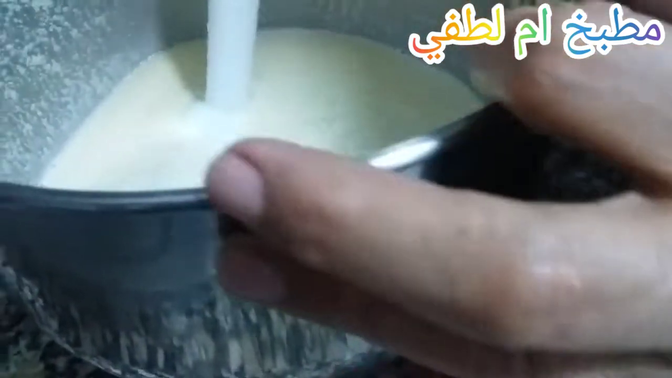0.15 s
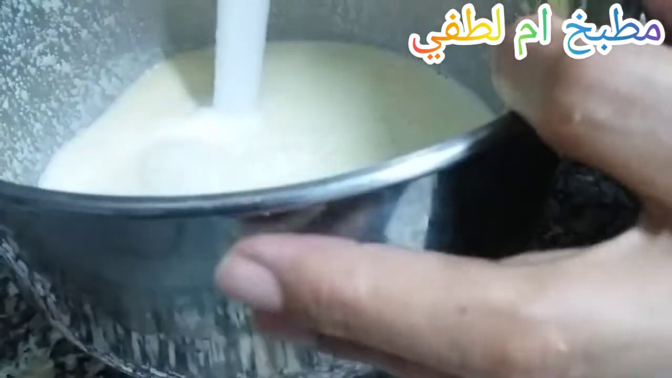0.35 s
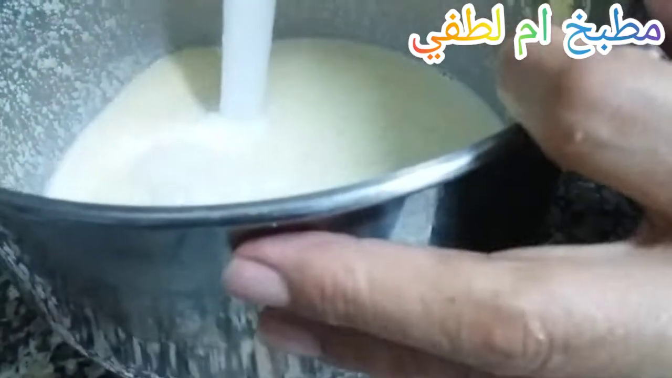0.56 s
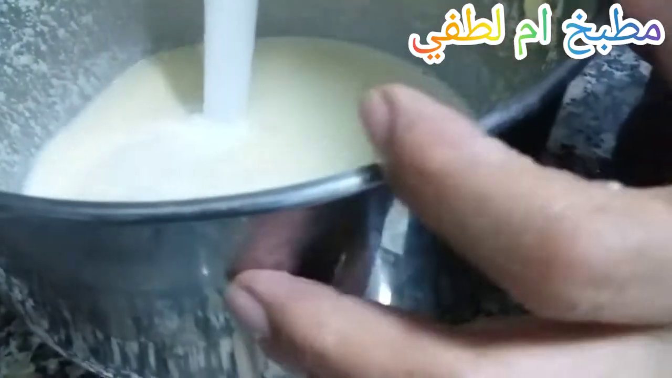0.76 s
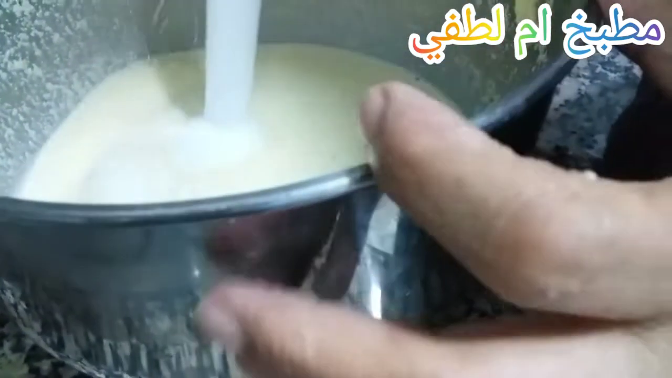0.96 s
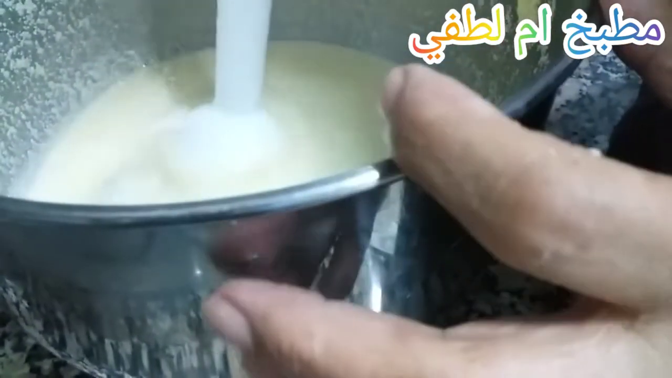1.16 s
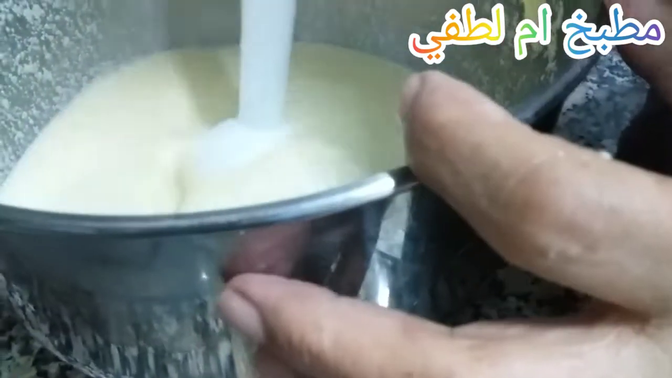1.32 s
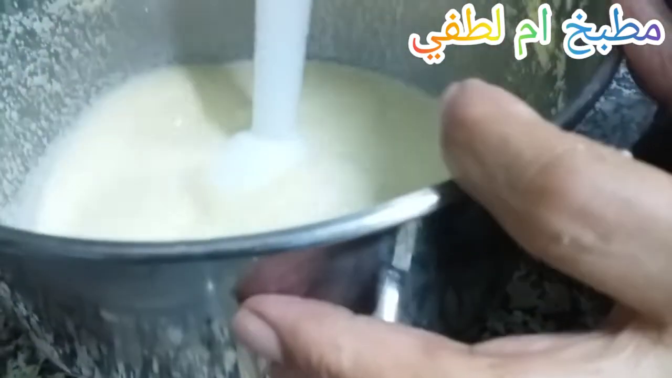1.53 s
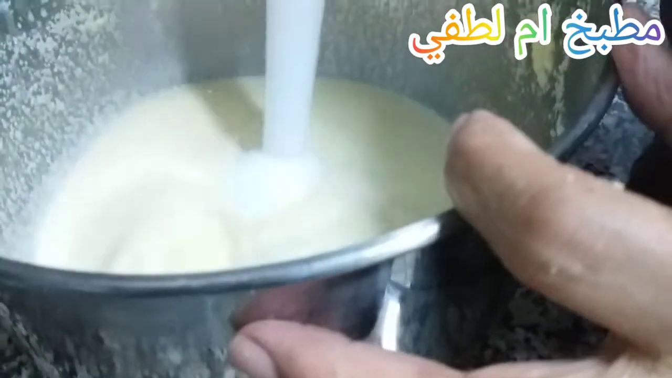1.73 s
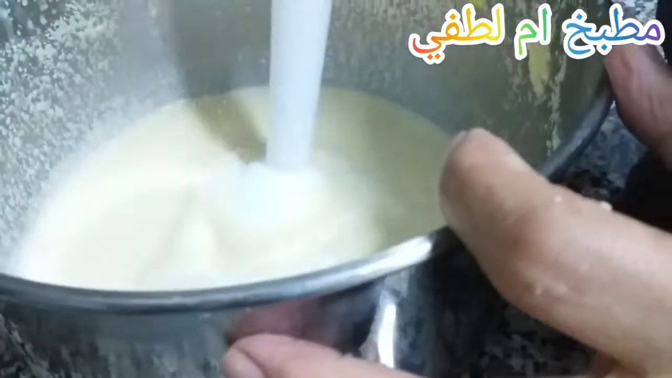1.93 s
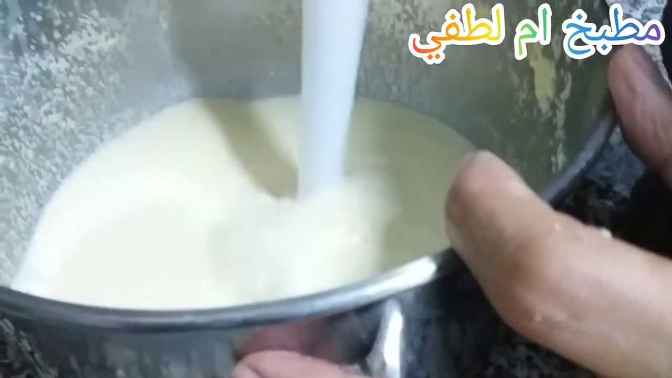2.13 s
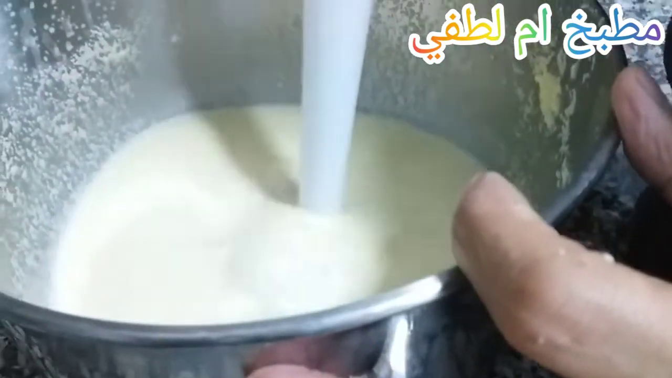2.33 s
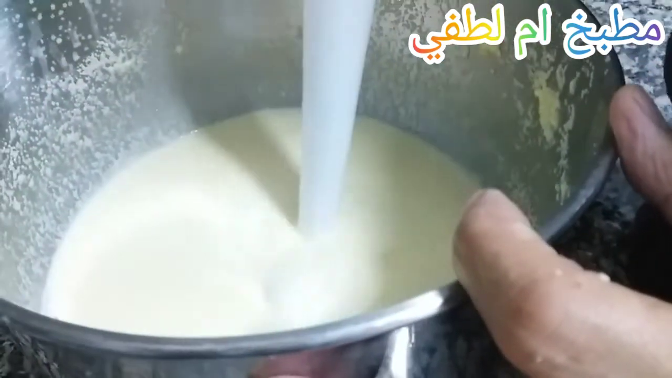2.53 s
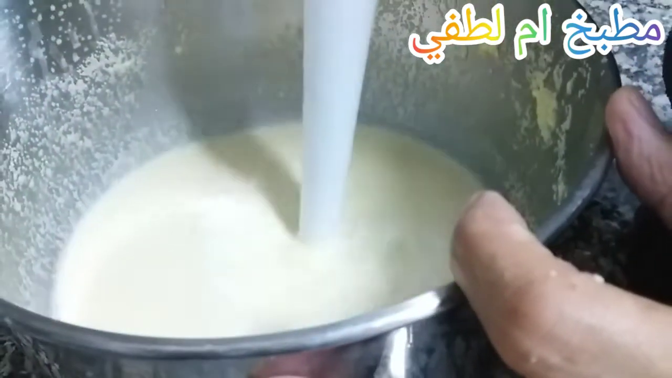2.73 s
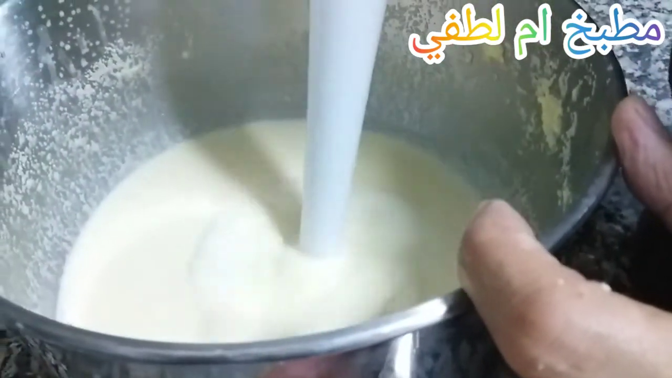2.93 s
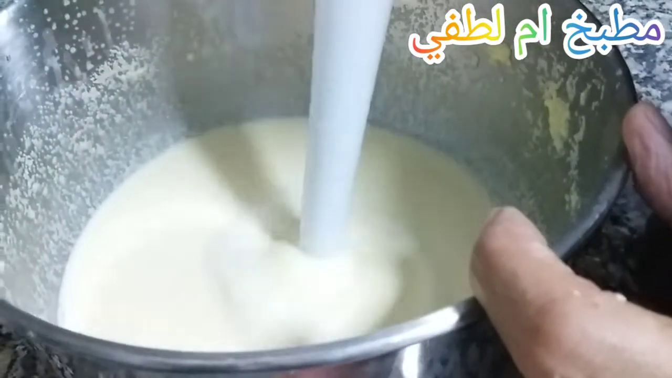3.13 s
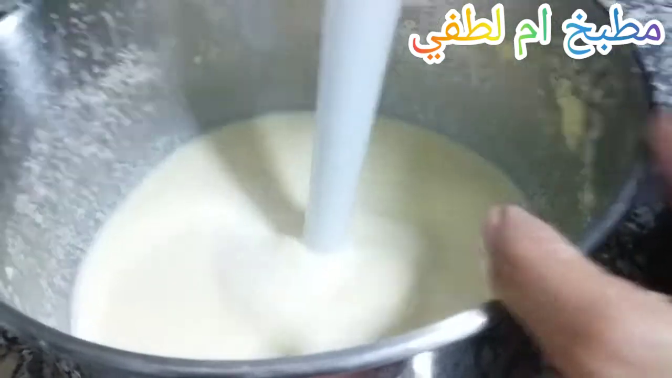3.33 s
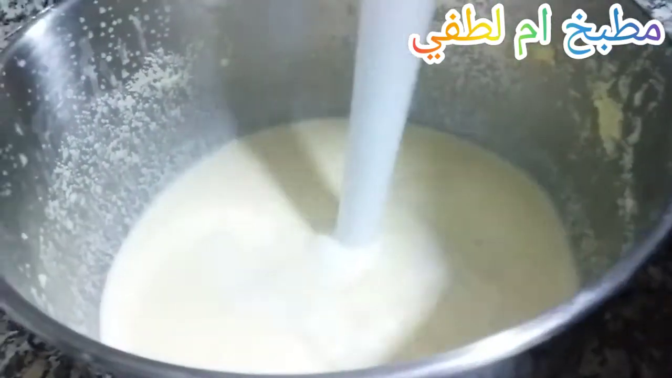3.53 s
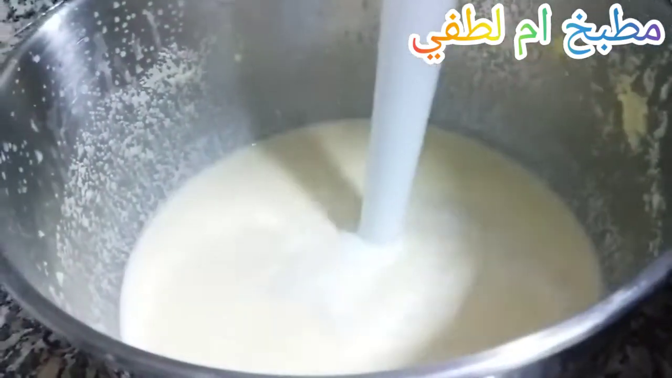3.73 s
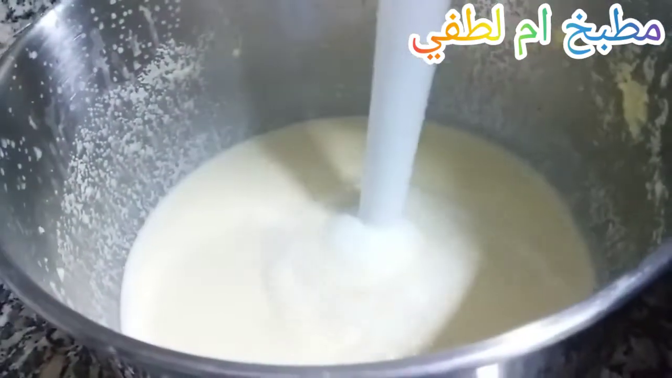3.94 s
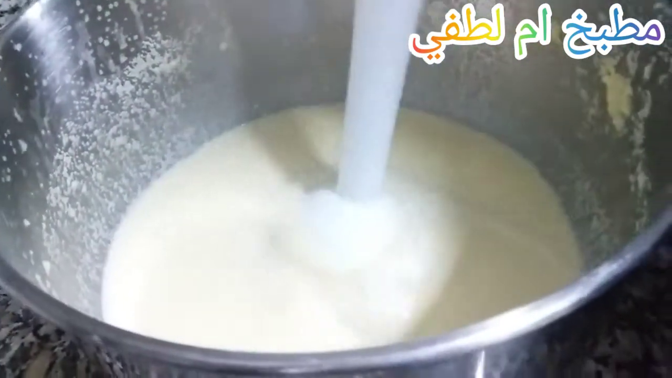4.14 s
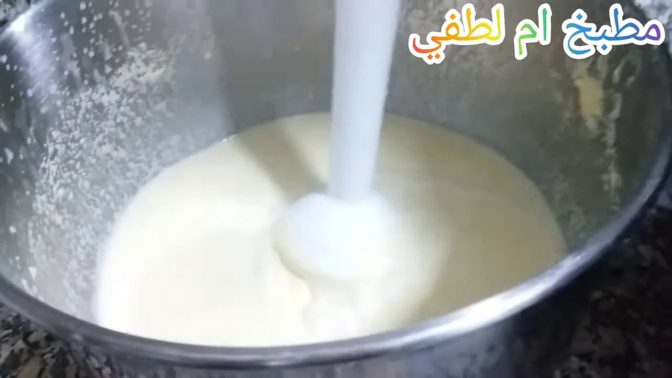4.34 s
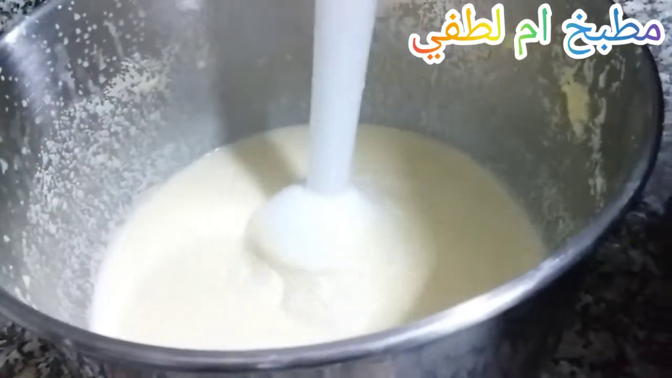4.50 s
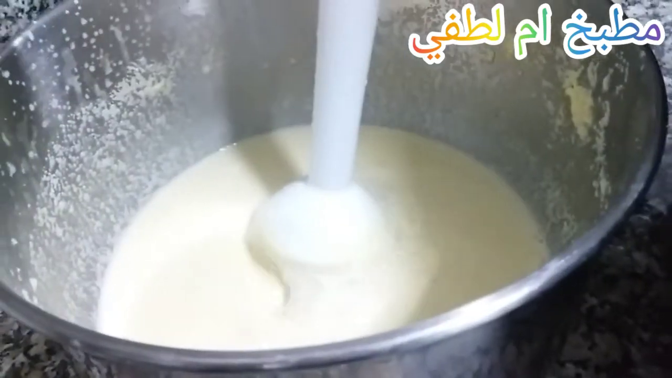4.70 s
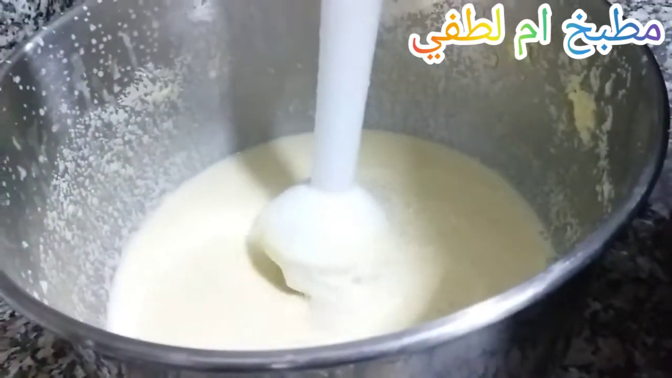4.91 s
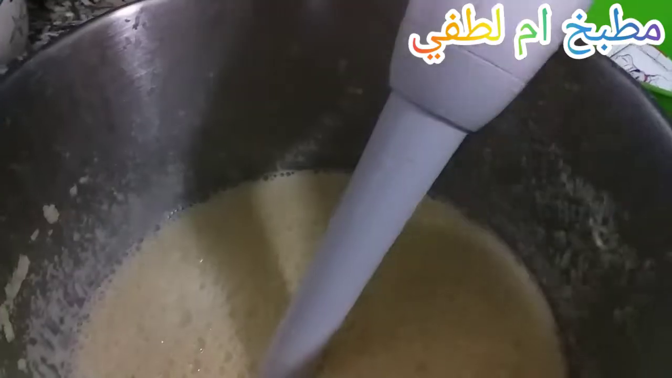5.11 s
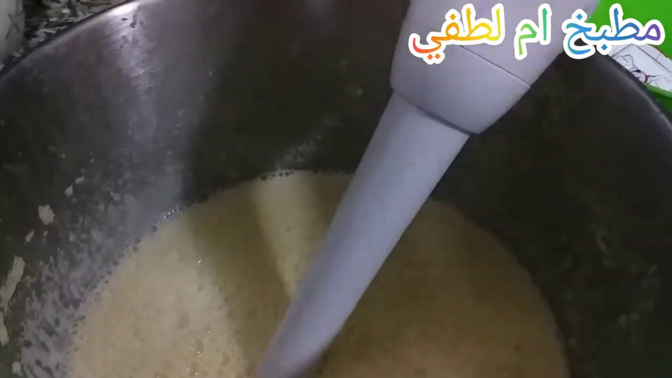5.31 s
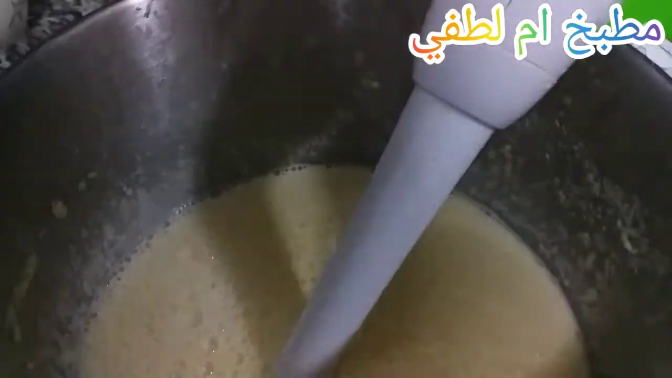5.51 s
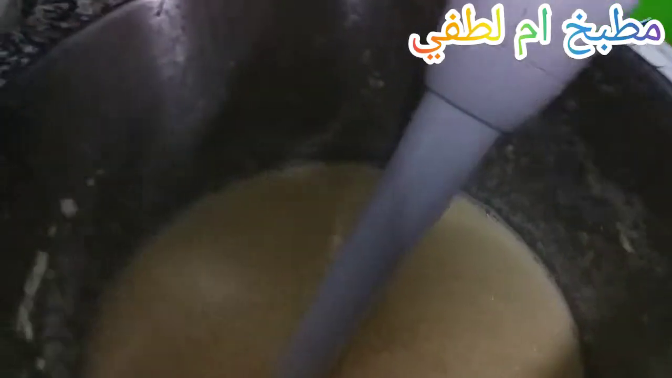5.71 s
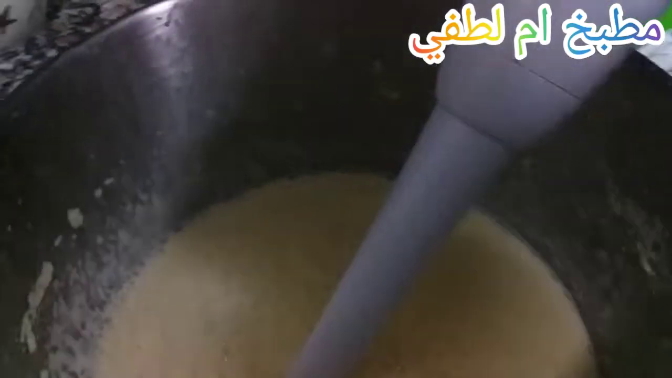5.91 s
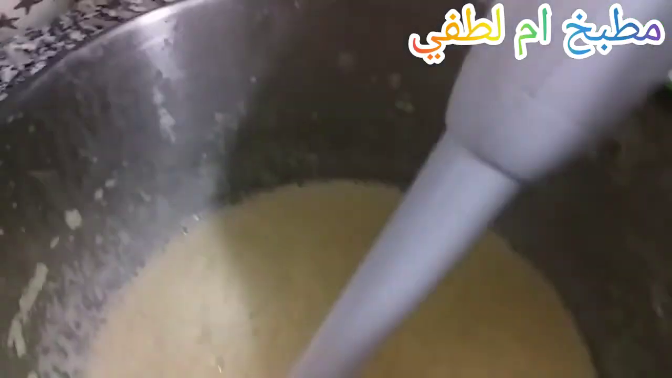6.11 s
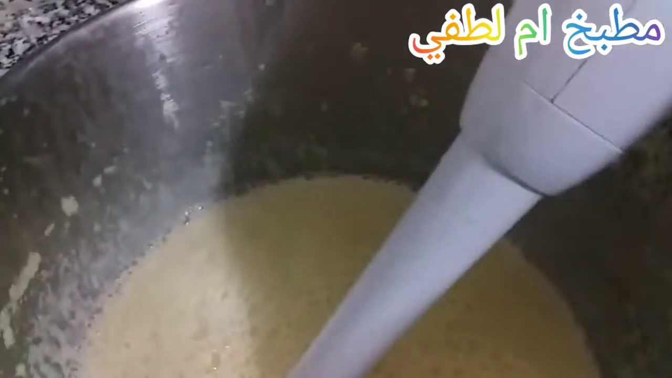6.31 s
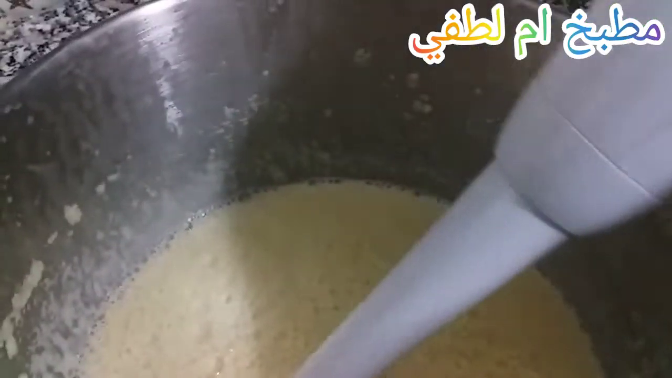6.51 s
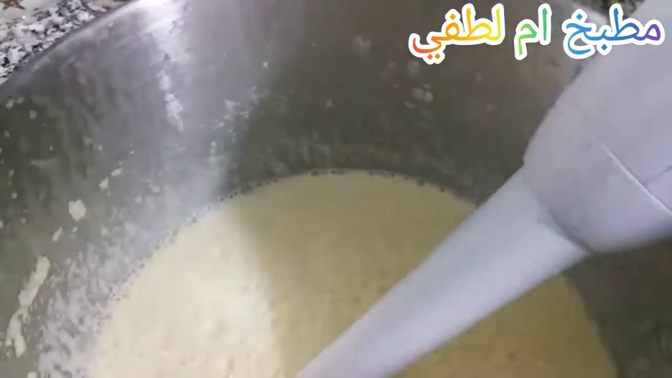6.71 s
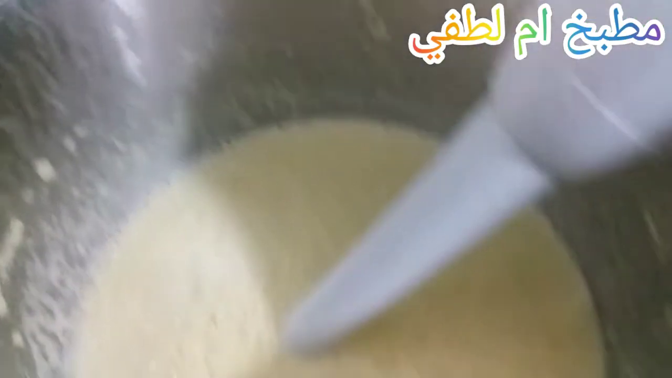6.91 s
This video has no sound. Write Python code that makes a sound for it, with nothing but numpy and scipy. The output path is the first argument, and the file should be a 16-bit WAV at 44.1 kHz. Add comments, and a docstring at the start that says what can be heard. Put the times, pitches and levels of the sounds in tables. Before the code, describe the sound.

A hand blender buzzes and churns thin batter in a steel pot, winds down at about four seconds, then scraping handling noise and soft plastic knocks.

```python
"""A stick blender whips batter in a steel pot: shaft orders hum, a struck stem rattles, the commutator whines
and filtered noise churns and hisses. It is switched off at about 4.2 s and coasts down to a halt.
Strokes of scraping noise then brush over the microphone, with brief resonant catches.
Decaying modes of the blender's plastic body knock softly, mostly near 6.7 s, as it is shifted.
The near sounds get a short kitchen tail, over a faint room tone and a thin whistle."""
import sys
import numpy as np
from scipy import signal
from scipy.fft import rfft, irfft, next_fast_len
from scipy.io import wavfile
from scipy.ndimage import uniform_filter1d, minimum_filter1d, map_coordinates

SR = 44100
rng = np.random.default_rng(int(sys.argv[2]) if len(sys.argv) > 2 else 0)


def digitize_waveform(pressure):
    """Quantize a signal to 16-bit integers and store it at the path in sys.argv[1].

    Rows of a 2-D input are taken as channels; values are limited to [-1, 1].
    """
    field = np.atleast_2d(pressure).T
    bounded = np.clip(field, -1, 1)
    quanta = np.round(bounded * 32767).astype(np.int16)
    wavfile.write(sys.argv[1], SR, quanta)


N = 306668

# Low rumble of shaken surfaces. Each row: frequency in Hz, relative level in dB.
RUMBLE_SPECTRUM = [(20, -35), (40, -23), (60, -1), (125, 3.5), (165, -5.5), (240, -11.5), (340, -2.5),
                   (450, -19), (900, -33), (2000, -71.5)]

OFF_S = 4.205  # switch-off, seconds
FRICTION_HZ = 20  # dry friction, as a speed in turns per second
HUM_DROP_DB = -3  # change of the second and third orders as the drive lets go


def amp(db):
    """Level law: decibels to amplitude gain."""
    return np.exp(np.asarray(db) * (np.log(10) / 20))


def unit(x):
    """Normalisation by mean power: scale to rms 1."""
    return x / np.sqrt(np.mean(x ** 2) + 1e-20)


def clock():
    """Uniform sampling: the time of every sample in seconds."""
    return np.arange(N) / SR


def along(points, hz):
    """Interpolation on a logarithmic frequency axis of (Hz, value) points."""
    f, v = np.transpose(points)
    return np.interp(np.log(hz + 1), np.log(f + 1), v)


def curves(rows):
    """Linear interpolation in time: one curve for each column after the time."""
    s, *cols = np.transpose(rows)
    return [np.interp(clock(), s, c) for c in cols]


def swell(s, length):
    """Gaussian envelope centred on s, with standard deviation length, in seconds."""
    out = np.zeros(N)
    first = max(0, int((s - 5 * length) * SR))
    last = min(N, int((s + 5 * length) * SR))
    near = np.arange(first, last)
    out[near] = np.exp(-.5 * ((near / SR - s) / length) ** 2)
    return out


def wobble(rate):
    """Band-limited random modulation: a smooth curve of rms 1 through rate knots a second."""
    step = 16  # samples that share one value
    knots = rng.standard_normal(int(N * rate / SR) + 4)
    smooth = map_coordinates(knots, [np.arange(0, N, step) * rate / SR])
    return np.repeat(unit(smooth), step)[:N]


def noise():
    """White noise: independent Gaussian samples."""
    return rng.standard_normal(N)


def grainy(rate, depth_db):
    """Amplitude-modulated noise: small random clumps."""
    return noise() * amp(depth_db * wobble(rate))


def patchy(x, depth_db):
    """Time-varying filtering: a smoothed random field shifts the colour of x from patch to patch."""
    z = signal.stft(x, nperseg=1024)[2]
    field = rng.standard_normal(z.shape)
    field = uniform_filter1d(field, size=4, axis=0)  # across frequency
    field = uniform_filter1d(field, size=6, axis=1)  # across time
    return signal.istft(z * amp(depth_db * unit(field)), nperseg=1024)[1][:N]


def filtered(x, response):
    """Linear filtering: the spectrum of x times a response of frequency."""
    size = next_fast_len(N + SR // 2)
    return irfft(rfft(x, size) * response(np.fft.rfftfreq(size, 1 / SR)), size)[:N]


def coloured(x, spectrum):
    """Spectral shaping: x through a broad spectrum, at rms 1."""
    return unit(filtered(x, lambda hz: amp(along(spectrum, hz))))


def resonant(x, modes):
    """Modal superposition: x through damped resonances of alternating sign, at rms 1."""
    def response(f):
        """Second-order resonance: each mode passes a band around its centre."""
        total = 0
        for k, (centre, width, db) in enumerate(modes):
            damping = 1j * f * width
            total = total + (-1) ** k * amp(db) * damping / (centre * centre - f * f + damping)
        return total
    return unit(filtered(x, response))


def background():
    """Stationary shaped noise: the quiet kitchen, and a narrow band heard as a thin whistle."""
    # Each row: frequency in Hz, relative level in dB.
    room_tone = [(25, -9), (55, 2.5), (130, -3.5), (250, -22), (400, -21.5), (1000, -27), (2500, -29.5),
                 (8000, -23.5), (9800, -42), (15500, -39)]
    # Each row: centre in Hz, width in Hz, relative level in dB.
    whistle = [(15500, 60, 0)]
    return amp(-67.5) * coloured(noise(), room_tone) + amp(-73) * resonant(noise(), whistle)


def kitchen(x):
    """Reverberation: convolution with noise that decays at a rate set by frequency."""
    # Each row: frequency in Hz, decay time (t60) in seconds.
    decay_times = [(200, 0.48), (2000, 0.41), (10000, 0.27)]
    hz, t, z = signal.stft(rng.standard_normal(SR // 2), SR, nperseg=256)
    decay = amp(-60 * t / along(decay_times, hz)[:, None])
    tail = signal.istft(z * decay, SR, nperseg=256)[1]
    return signal.fftconvolve(x, tail / np.linalg.norm(tail))[:N]


def knocks():
    """Impact excitation: each contact ticks, rings the plastic body and thumps the filled pot."""
    # Each row: start in seconds, relative levels of ring, thump and tick in dB.
    contacts = [(5.026, -63, -54, -50), (6.667, -38, -55, -43), (6.671, -34, -52, -55),
                (6.678, -36, -42, -48), (6.687, -55, -42, -55), (6.730, -41.5, -50, -49),
                (6.740, -47, -35, -55), (6.792, -34.5, -41, -46), (6.805, -40.5, -29, -46)]
    # Modes of the body. Each row: nominal frequency in Hz, nominal level in dB, t60 in seconds.
    body = [(315, 4.5, 0.058), (530, -3, 0.083), (620, -3.5, 0.093), (752, -8, 0.045), (1094, 1.5, 0.039),
            (1228, -15, 0.036), (1695, -10, .05), (2280, -14.5, 0.048), (2560, -8, 0.058), (3036, -18, .04),
            (4450, -19, .04), (4800, -17, .04)]
    # Each row: frequency in Hz, relative level in dB.
    tick_spectrum = [(300, -14.5), (1200, -14), (2500, -3.5), (5000, -4), (8000, -9.5), (10000, -30),
                     (15000, -34)]
    out, ticks = np.zeros(N + SR), np.zeros(N + SR)
    t = np.arange(SR // 3) / SR
    # the thump drops quickly, then hums on
    thump = np.sin(2 * np.pi * 126 * t) * (amp(-60 * t / 0.1) + 0.37 * amp(-60 * t / 1.2))
    thump *= 1 - np.exp(-t / .003)
    for s, ring_db, thump_db, tick_db in contacts:
        start = round(s * SR)
        ring = np.zeros(len(t))
        for hz, db, t60 in body:
            # the grip detunes the modes a little from one contact to the next
            decay = amp(db + rng.normal(0, 1.4) - 60 * t / t60)
            ring += decay * np.sin(2 * np.pi * hz * rng.normal(1, 0.023) * t)
        out[start:][:len(t)] += amp(ring_db - 3.0) * ring + amp(thump_db) * thump
        ticks[start:][:len(t)] += amp(tick_db - 60 * t / 0.043)
    return out[:N] + ticks[:N] * coloured(noise(), tick_spectrum)


def catches():
    """Transient resonance: where the rubbing catches, one mode swells quickly and lets go."""
    # Each row: start in seconds, decay length in seconds, centre in Hz, width in Hz, relative level in dB.
    catch_rows = [(5.059, .05, 4620, 502, -47), (5.06, 0.097, 1936, 199, -51.5),
                  (5.17, 0.17, 1530, 198, -43), (5.275, .06, 2680, 444, -30), (5.275, .1, 5100, 400, -36),
                  (5.39, .045, 2890, 1998, -24), (5.5, .08, 4990, 500, -26), (5.543, .07, 1726, 597, -37.5),
                  (5.545, .09, 4420, 120.4, -31.5), (5.55, .06, 7120, 395, -32),
                  (6.408, 0.074, 714, 25, -51), (6.55, .045, 730, 24.8, -51)]
    out = np.zeros(N + SR)
    for s, length, hz, width_hz, db in catch_rows:
        age = np.arange(SR // 2) / SR / length  # in decay lengths
        ring = signal.lfilter(*signal.iirpeak(hz, hz / width_hz, SR), rng.standard_normal(len(age)))
        envelope = (1 - np.exp(-10 * age)) * np.exp(-age ** 2)
        out[round(s * SR):][:len(age)] += amp(db) * unit(ring) * envelope
    return out[:N]


def stroke(s, rise, hold):
    """Contact force envelope: the hand presses in, holds and lets go."""
    age = clock() - s
    release_db_per_s = 216.5
    return np.clip(age / rise, 0, 1) * amp(-release_db_per_s * np.maximum(age - rise - hold, 0))


def rubbing():
    """Friction noise: dense tiny slips scrape the casing, and the moving hand adds a rumble."""
    # Each row: start, rise and hold in seconds, relative levels of scrape, low drag and rumble in dB.
    strokes = [(5.019, .012, 0.022, -57, -56, -51), (5.06, .01, .065, -51.5, -62, -54),
               (5.155, 0.074, .05, -41.5, -45.5, -50), (5.268, 0.019, .072, -30.5, -37.5, -56.5),
               (5.35, .02, .015, -36, -43.5, -56), (5.383, 0.019, 0.016, -15.5, -34.5, -56),
               (5.43, 0.032, 0.033, -26.5, -39, -60), (5.495, 0.062, 0.036, -20.5, -37, -50),
               (5.62, 0.051, 0.061, -55.5, -58, -53), (5.742, 0.076, .085, -57, -72.5, -61),
               (5.933, .04, 0.26, -69.5, -74.5, -68), (6.19, 0.16, .07, -64, -71, -52.5),
               (6.385, .08, 0.031, -49, -54, -55), (6.515, 0.025, 0.068, -58.5, -53, -55),
               (6.622, .08, .15, -58.5, -63, -61), (6.907, .015, .03, -51.5, -63, -58)]
    # Three spectra. Each row: frequency in Hz, relative level in dB.
    scrape_spectrum = [(650, -44.5), (1100, -10.5), (1150, -9), (1590, -6.5), (1830, -7.5), (2240, -3.5),
                       (4230, -1.5), (6030, -6.5), (7050, -3), (8710, -6), (9730, -29), (12600, -17.5),
                       (15700, -27)]
    drag_spectrum = [(100, -43.5), (170, -11.5), (232, -14.5), (337, 2), (420, -3.5), (630, -2), (860, -5),
                     (1500, -13.5), (1950, -32.5), (3300, -120)]
    puff_spectrum = [(20, -10), (50, -3), (80, -7), (160, -30), (400, -70.5)]  # air pushed into the microphone port
    # Rubbed casing. Each row: centre in Hz, width in Hz, relative level in dB.
    casing = [(1830, 99, -4.5), (4180, 91, -4.5), (4840, 37, 0), (6250, 34, -11.5), (7260, 95, -5)]
    # overlapping strokes add in power
    power = sum(np.outer(amp(db), stroke(s, rise, hold)) ** 2 for s, rise, hold, *db in strokes)
    scraping, dragging, rumbling = np.sqrt(power)
    slips = patchy(grainy(rate=490, depth_db=1.1), depth_db=3.5)
    scrape = amp(-1.0) * coloured(slips, scrape_spectrum)
    scrape += amp(-9) * resonant(noise(), casing)
    scrape += amp(-26) * coloured(noise(), puff_spectrum)
    drag = amp(-0.5) * coloured(slips, drag_spectrum)
    return scraping * scrape + dragging * drag + rumbling * coloured(noise(), RUMBLE_SPECTRUM)


def spray():
    """Droplet noise: the blade catches air and spits short bursts of fine spray."""
    # Each row: centre in seconds, standard deviation in seconds, level in dB.
    spits = [(1.697, .022, -23.5), (1.75, .01, -35), (4.235, .015, -46)]
    # Each row: frequency in Hz, relative level in dB.
    spray_spectrum = [(800, -23), (2000, -3.5), (7500, 4.5), (10000, -8), (15500, -14)]
    bursts = sum(amp(db) * swell(s, length) for s, length, db in spits)
    return bursts * coloured(grainy(rate=460, depth_db=1.5), spray_spectrum)


def batter_load():
    """Fluctuating load: batter sloshes against the blade about four times a second."""
    # Each row: centre in seconds, standard deviation in seconds, load from 0 to 1.
    surges = [(0.0, .03, .9), (0.413, .05, .5), (0.557, .04, .5), (0.795, .04, .45), (1.061, .06, .85),
              (1.382, .055, .85), (1.586, .045, .7), (1.856, .05, .7), (2.11, .05, .9), (2.294, .045, 1.0),
              (2.564, .045, .85), (2.77, .045, .9), (3.016, .045, 0.97), (3.252, .05, .7),
              (3.52, .055, 0.8), (3.822, .05, .95), (4.063, .05, .55)]
    return sum(strength * swell(s, length) for s, length, strength in surges)


def shaft(load):
    """Rotational dynamics: the shaft sags under load, then drag and dry friction bring it to a halt."""
    # Speed between surges. Each row: time in seconds, speed in turns per second.
    free_speed = [(0, 167.8), (.9, 168.3), (1.3, 166.2), (2.05, 166.2), (2.4, 168.4), (3.93, 168.7),
                  (4.15, 166.6)]
    sag_hz, drag_s = 2.1, .31  # sag at load 1; the batter's drag time
    driven = curves(free_speed)[0] - sag_hz * load
    coasted = np.maximum(clock() - OFF_S, 0)
    speed = np.maximum((driven + FRICTION_HZ) * np.exp(-coasted / drag_s) - FRICTION_HZ, 0)
    # the turns flutter more without power
    flutter = np.where(coasted > 0, .025, .002)
    return speed, np.cumsum(speed * (1 + flutter * wobble(60))) / SR


def order(turns, multiple, rough, rate):
    """Order tone: a whole multiple of the shaft turns, shaken in strength and phase by the batter."""
    cycles = round(multiple) * turns + rng.random()
    phase = 2 * np.pi * (cycles - np.floor(cycles)) + rough * wobble(rate)
    return unit((1 + rough * wobble(rate)) * np.cos(phase.astype(np.float32)))


def order_sum(turns, rows, rough, rate):
    """Harmonic superposition: orders from (multiple, dB) rows."""
    return sum(amp(db) * order(turns, k, rough, rate) for k, db in rows)


def slaps(turns, scatter, size_db):
    """Periodic impact: the loose shaft strikes its bearing once a turn, never quite alike."""
    whole = np.arange(1, int(turns[-1]))
    chance = rng.standard_normal((len(whole), 2))
    at = np.searchsorted(turns, whole + scatter * chance[:, 0]).clip(0, N - 1)
    speed = np.gradient(turns)[at] * SR
    return unit(np.bincount(at, amp(size_db * chance[:, 1]) / np.sqrt(speed + 15), N))


def shake(turns, speed, pace, off):
    """Forced vibration: the blender shakes in the hand and strikes low rings from the pot."""
    # Low pot rings. Each row: centre in Hz, width in Hz, relative level in dB.
    pot_low = [(119.5, 22, -10.5), (191, 6.1, -2.5)]
    # driven levels, plus what the loose, coasting shaft adds
    shake_db, pot_low_db = -54 + 18 * off, -42.5 + 11.5 * off
    out = amp(shake_db) * pace ** 1.7 * coloured(noise(), RUMBLE_SPECTRUM)
    # the pot rings until the shaft is too slow to strike
    striking = np.clip(speed / FRICTION_HZ - 1, 0, 1) * pace ** 0.97
    strikes = slaps(turns, scatter=.1, size_db=-1) + noise()
    return out + amp(pot_low_db) * striking * resonant(strikes, pot_low)


def hiss():
    """Broadband flow and friction noise: the brushes and the cooling air."""
    # Each row: frequency in Hz, relative level in dB.
    hiss_spectrum = [(600, -25), (1500, -3.5), (2400, -0.5), (3000, 0), (3900, 0), (4600, -3), (6000, -5.5),
                     (7300, -2.5), (8200, -2.5), (9200, -16.5), (10600, -30.5), (12200, -13.5),
                     (13300, -22), (15700, -22.5)]
    return amp(1) * coloured(patchy(grainy(rate=530, depth_db=0.55), depth_db=2.0), hiss_spectrum)


def whine(turns, third):
    """Amplitude modulation: uneven commutator bars put sidebands one turn rate apart."""
    # Each row: multiple of the shaft speed, relative level in dB.
    whine_orders = [(24, -15.5), (48, -13), (60, -31), (72, -23), (84, -36)]
    bars = 1 + 0.43 * np.cos(2 * np.pi * turns)
    # side load on the shaft raises the whine along with the third order
    side_load = 0.4 + third / third.max()
    return bars * side_load * order_sum(turns, whine_orders, rough=0.45, rate=44)


def rattle(turns, off):
    """Struck resonator: shaft slaps and noise ring the plastic stem, with a longer ring once undriven."""
    # Both tables. Each row: centre in Hz, width in Hz, relative level in dB.
    stem = [(1717, 80, 1), (1851, 89, -2), (2016, 180, -7), (2222, 99, -8), (2600, 250, -16),
            (3400, 900, -24.5)]
    free_ring = [(1725, 55, 0)]
    strikes = slaps(turns, scatter=.05, size_db=1.0) + 1.5 * noise()
    return amp(-2.5) * resonant(strikes, stem) + amp(-3.5) * off * resonant(noise(), free_ring)


def churn(turns, pot_db):
    """Modulated turbulence: the blade churns the batter, and the air in the pot resonates."""
    # Batter. Each row: frequency in Hz, relative level in dB.
    churn_spectrum = [(25, -65), (50, -50.5), (90, -28), (140, -12), (200, -8.5), (285, -11.5), (365, 1.5),
                      (440, -3.5), (550, 1), (760, -5.5), (1300, -9), (1450, -11.5), (2500, -21),
                      (5000, -50)]
    # Air in the pot. Each row: centre in Hz, width in Hz, relative level in dB.
    pot_air = [(395, 42, -3.5), (498, 61, 2.5), (687, 140, -1), (847, 60, -6), (1040, 100, 0),
               (1148, 48, 8.5)]
    # each of the two blades pushes a pulse of batter past the guard
    blades = 1 + 0.44 * np.cos(4 * np.pi * turns)
    batter = amp(-1.5) * coloured(blades * grainy(rate=60, depth_db=2.0), churn_spectrum)
    strikes = slaps(turns, scatter=.1, size_db=5.0) + noise()
    return batter + amp(pot_db) * resonant(strikes, pot_air)


def overtones(turns, pace, churning, rattling, rattle_db):
    """Harmonic radiation: weaker orders follow the churning, the rattle and a level curve of their own."""
    # Three sets of orders. Each row: multiple of the shaft speed, relative level in dB.
    churn_orders = [(4, -9), (5, -12), (6, -11.5), (7, -10.5), (8, -19), (9, -17.5), (10, -17), (12, -17)]
    stem_orders = [(10, -3), (11, -3.5), (12, -9), (13, -14)]
    high_orders = [(14, 0), (15, -4.5)]
    # Level of the high orders before the fall with speed. Each row: time in seconds, level in dB.
    high_levels = [(0, -41), (1.0, -37.5), (1.6, -32), (2.1, -41), (4.2, -44)]
    out = churning * order_sum(turns, churn_orders, rough=0.48, rate=35)
    # a pair of high motor orders swells until about 1.6 s, then fades
    high_gain = pace * amp(curves(high_levels)[0])
    out += high_gain * order_sum(turns, high_orders, rough=.4, rate=35)
    # the harder the stem rattles, the more it locks to the shaft
    full_lock_db = -16.5
    singing = rattling * amp(1.25 * np.minimum(rattle_db - full_lock_db, 0))
    return out + singing * order_sum(turns, stem_orders, rough=.5, rate=40)


def hum(turns, pace, off, first, second, third):
    """Low-order radiation: unbalance, blade beat and third order fade as a power of speed."""
    out = amp(-1.5) * first * order(turns, multiple=1, rough=.22, rate=33)
    out += amp(-0.86) * second * order(turns, multiple=2, rough=.17, rate=40)
    out += amp(1) * third * order(turns, multiple=3, rough=.24, rate=55)
    # the unpowered shaft judders
    return out * pace ** 2.9 * (1 + 0.46 * off * wobble(90))


def blender():
    """Rotating-machine sound: hum, churning, rattle and whine share one shaft and its load."""
    # Blade depth between surges. Each row: time in seconds, relative levels of the unbalance and
    # the third order in dB, pot ring in dB over the churning.
    depth_levels = [(0, -32, -20.5, -4.5), (.25, -30.5, -21.5, -5.5), (.45, -36.5, -22, -5),
                    (.68, -27.5, -28.5, -4), (1.18, -41.5, -27, -7), (1.95, -42, -25, -3.5),
                    (2.14, -37.5, -17.5, -5.5), (2.85, -39.5, -22, -7), (3.6, -37, -22, -8),
                    (4.2, -40, -25.5, -5.5)]
    # Beat of the two blades, fading where they lose grip. Each row: time in seconds, relative level in dB.
    beat_levels = [(0, -19), (.38, -17), (.53, -16), (.95, -18.5), (1.06, -12), (1.19, -33.5),
                   (1.29, -14.5), (1.42, -24.5), (1.73, -26), (1.79, -18.5), (1.94, -34), (2.03, -16),
                   (2.11, -25), (2.3, -14.5), (2.39, -29), (2.45, -17.5), (3.52, -17), (3.96, -24),
                   (4.11, -13.5), (4.21, -26.5)]
    # Work in the batter. Each row: time in seconds, relative levels of churning, rattle and hiss in dB.
    work_levels = [(0, -19, -27.5, -31), (.8, -20.5, -27.5, -31.5), (1.23, -20.5, -25, -28),
                   (1.6, -19.5, -24, -29), (1.68, -19, -19, -25), (1.8, -20, -21, -29.5),
                   (1.96, -19, -20, -28), (2.1, -19, -21, -31), (2.7, -20.5, -22, -32),
                   (3.05, -20.5, -20.5, -31.5), (3.78, -21.5, -22, -31), (4.0, -21, -20, -29.5),
                   (4.17, -21.5, -21, -29), (4.24, -21, -17, -21.5)]
    load = batter_load()
    speed, turns = shaft(load)
    pace = speed / speed.max() + 1e-9
    # 0 while driven, 1 once the drive has let go, 0.06 s after switch-off
    off = np.clip((clock() - OFF_S) / .06, 0, 1) ** 2
    unbalance_db, third_db, pot_db = curves(depth_levels)
    churn_db, rattle_db, hiss_db = curves(work_levels)

    # the slowing unbalance swells as it passes a low mode of the filled pot
    pot_mode_hz, passing_width_hz, passing_db = 109.6, 33, 17.5
    passing = np.exp(-.5 * ((speed - pot_mode_hz) / passing_width_hz) ** 2)
    first = amp(unbalance_db + 9 * load + passing_db * off * passing)
    second = amp(curves(beat_levels)[0] + HUM_DROP_DB * off)
    third = amp(third_db + 8.5 * load + HUM_DROP_DB * off)

    # each layer steps in level as the drive lets go, then falls as a power of the speed
    churning = amp(churn_db + 1.5 * (load - load.mean()) + 2.5 * off) * pace ** 1.95
    rattling = amp(rattle_db - 15.5 * off) * pace
    hissing = amp(hiss_db - 5.5 * off) * pace ** 1.415
    # the batter churns unevenly and the rattle comes in fits
    churning *= amp(.8 * wobble(25))
    rattling *= amp(1.2 * wobble(22))

    out = hum(turns, pace, off, first, second, third) + shake(turns, speed, pace, off)
    driven_tones = overtones(turns, pace, churning, rattling, rattle_db) + hissing * whine(turns, third)
    out += (1 - off) * driven_tones
    return out + churning * churn(turns, pot_db) + rattling * rattle(turns, off) + hissing * hiss()


def scene():
    """Superposition: all sources close by, their reverberation and the room's faint tone."""
    near = blender() + spray() + rubbing() + catches() + knocks()
    return (near + amp(-15.0) * kitchen(near) + background())[None]


def record(dry):
    """Peak limiting and band limiting: the recorder eases down high peaks and cuts the top band."""
    needed = np.minimum(1, .93 / (np.abs(dry[0]) + 1e-9))
    gain = uniform_filter1d(minimum_filter1d(needed, size=301), size=301)
    top_hz = 15750
    return filtered(dry[0] * gain, lambda hz: hz < top_hz)[None]


dry = scene()
out = record(dry)
digitize_waveform(out)
```